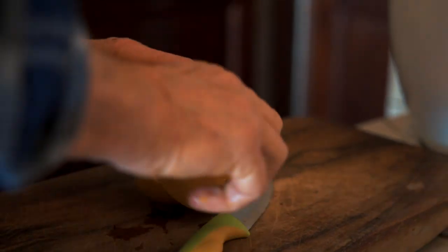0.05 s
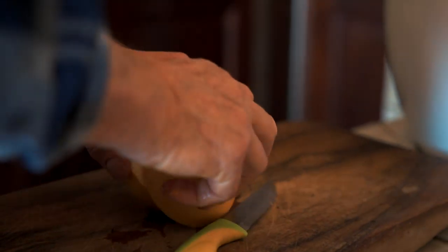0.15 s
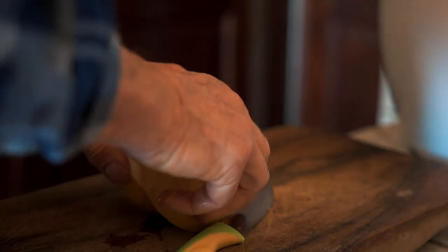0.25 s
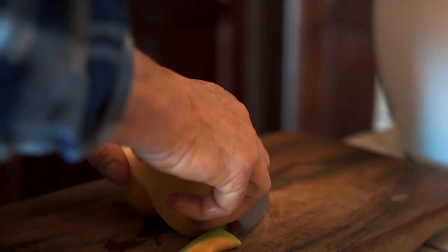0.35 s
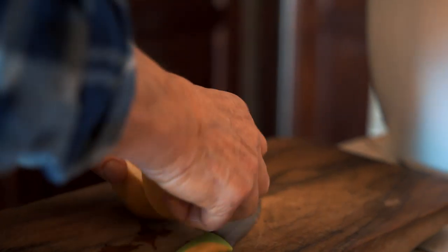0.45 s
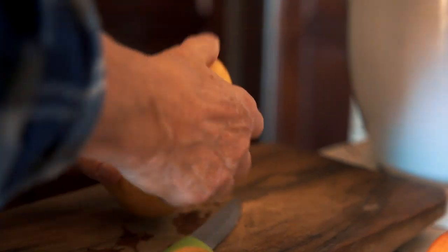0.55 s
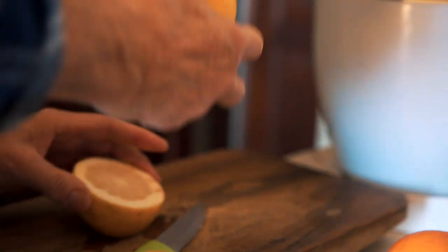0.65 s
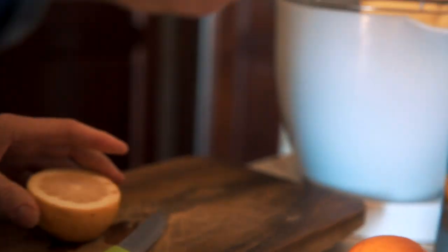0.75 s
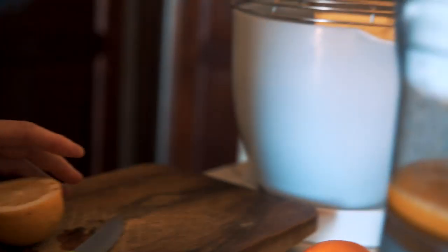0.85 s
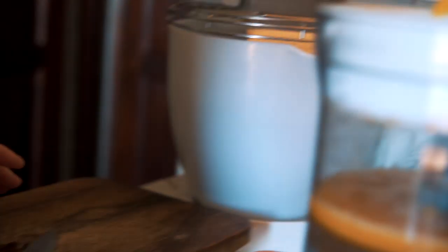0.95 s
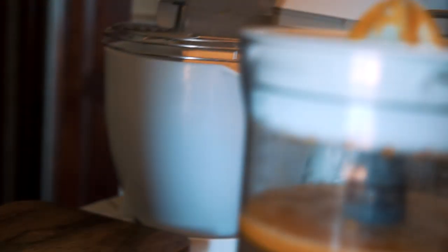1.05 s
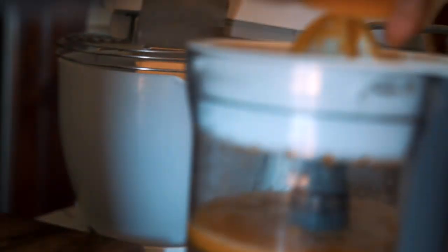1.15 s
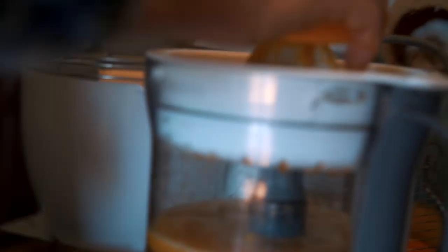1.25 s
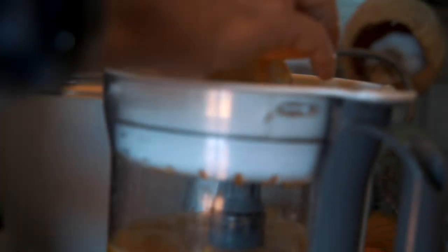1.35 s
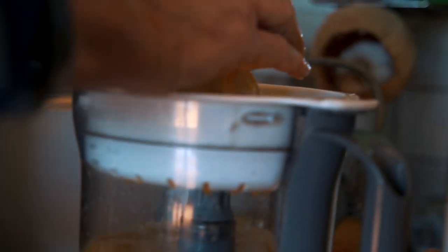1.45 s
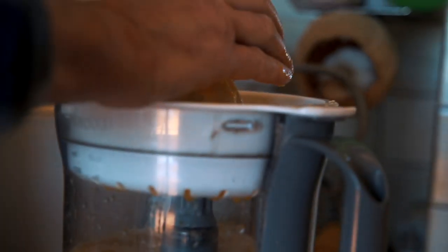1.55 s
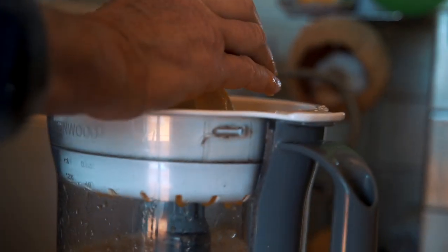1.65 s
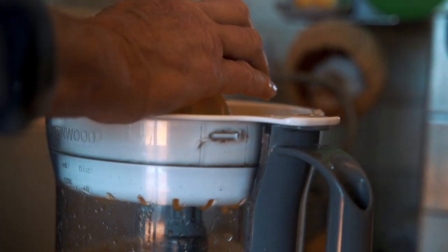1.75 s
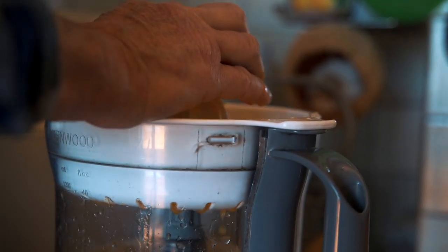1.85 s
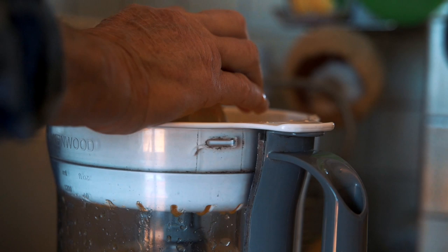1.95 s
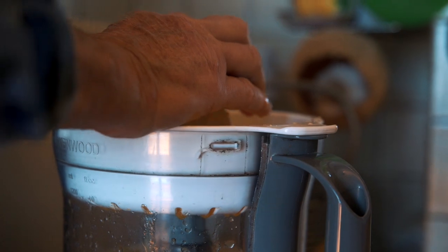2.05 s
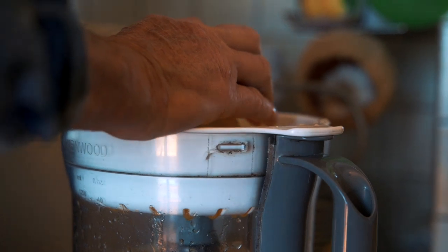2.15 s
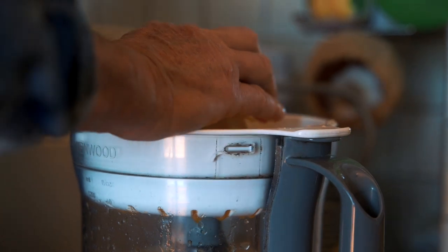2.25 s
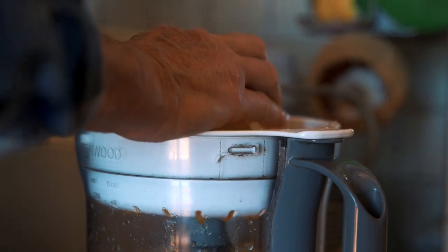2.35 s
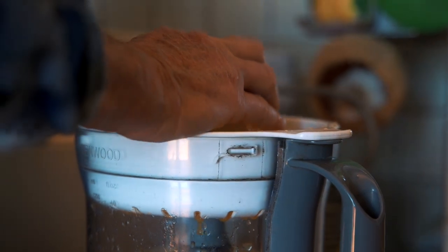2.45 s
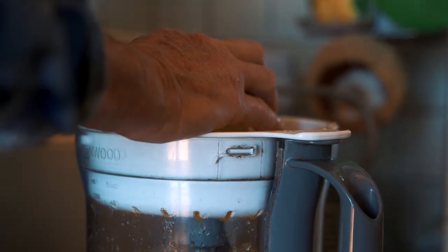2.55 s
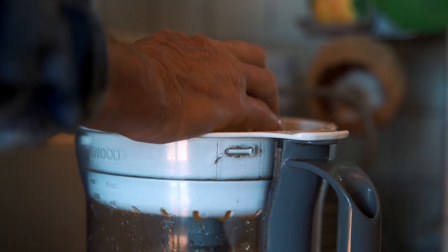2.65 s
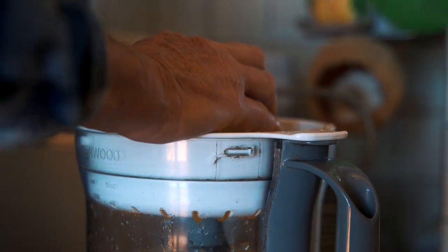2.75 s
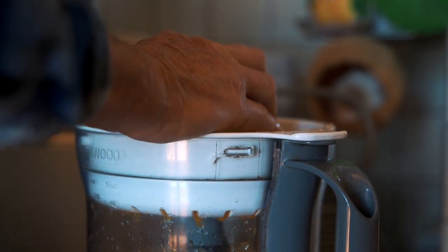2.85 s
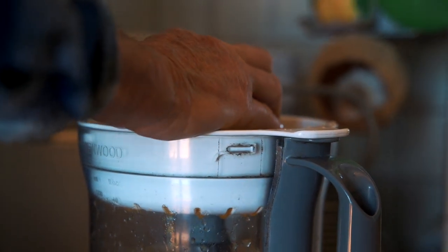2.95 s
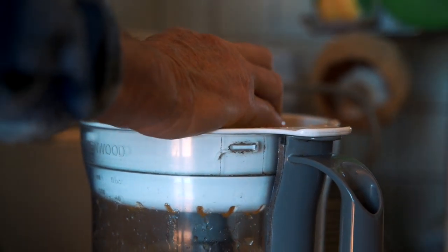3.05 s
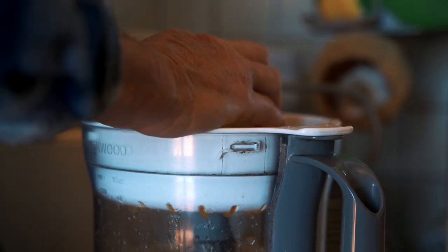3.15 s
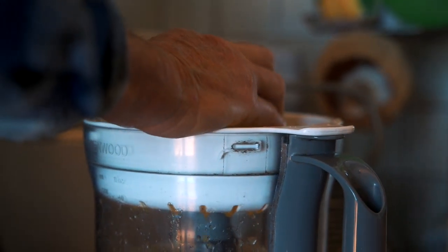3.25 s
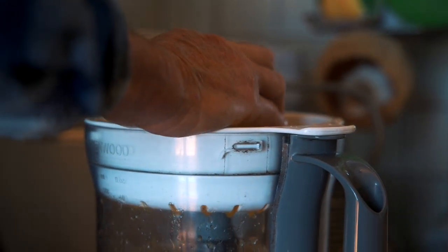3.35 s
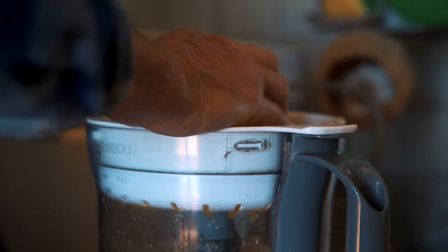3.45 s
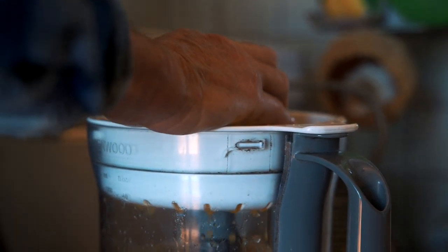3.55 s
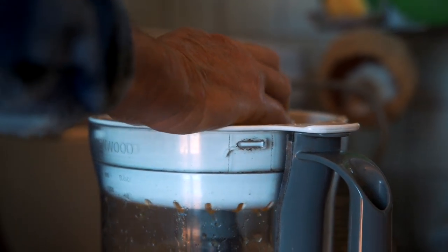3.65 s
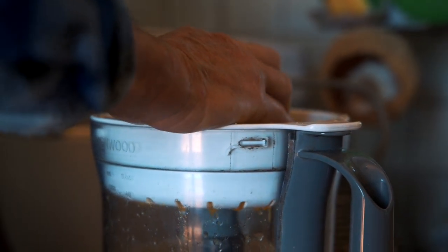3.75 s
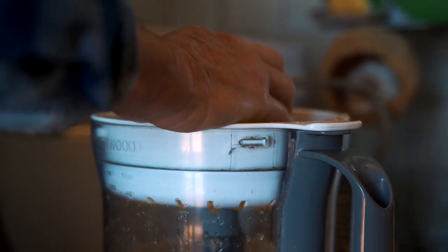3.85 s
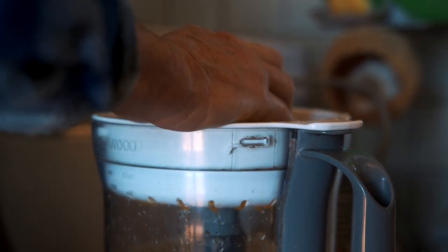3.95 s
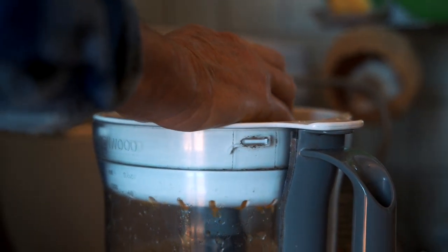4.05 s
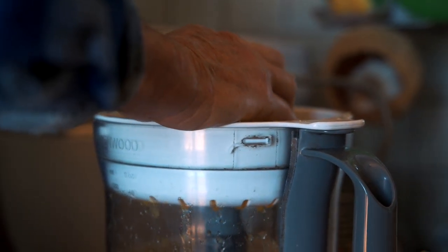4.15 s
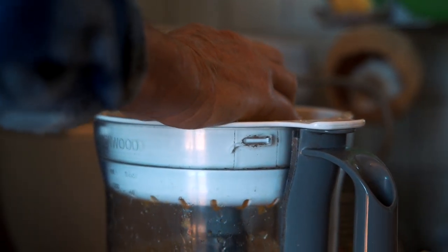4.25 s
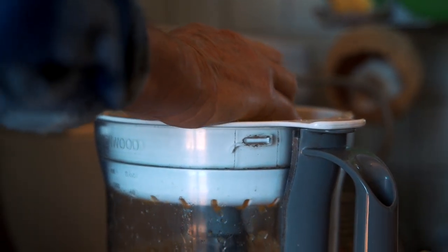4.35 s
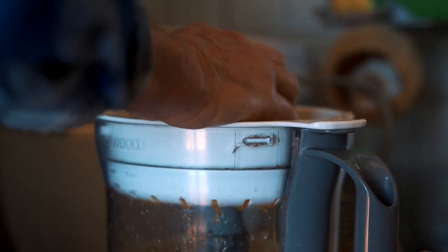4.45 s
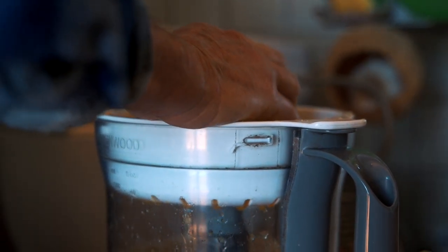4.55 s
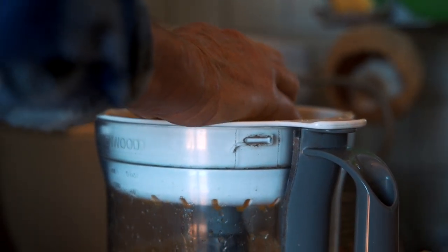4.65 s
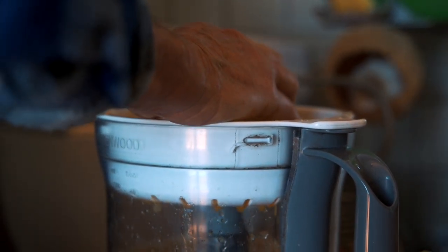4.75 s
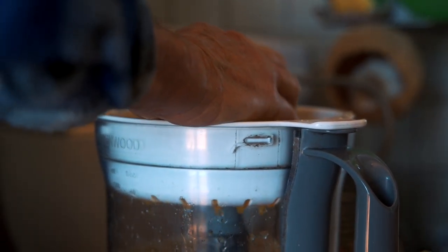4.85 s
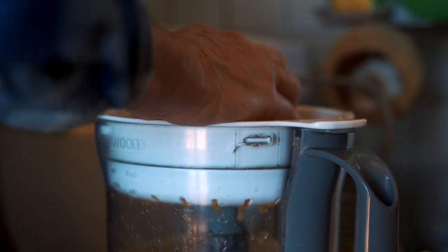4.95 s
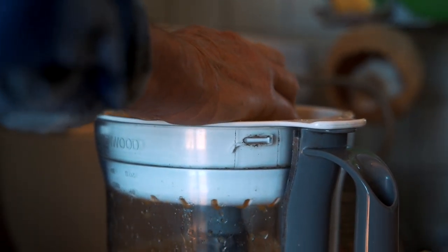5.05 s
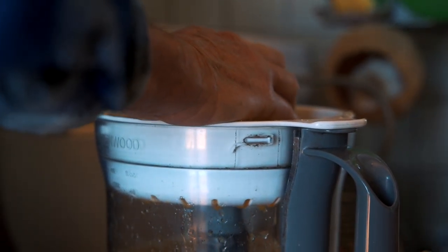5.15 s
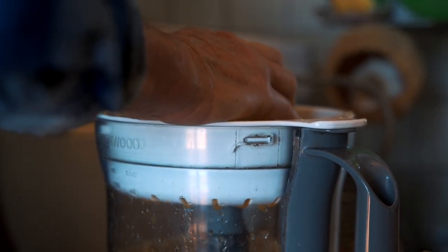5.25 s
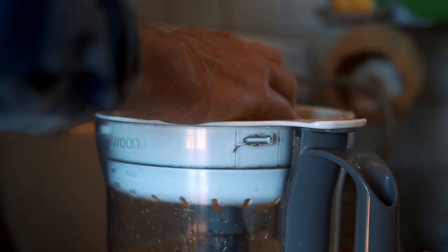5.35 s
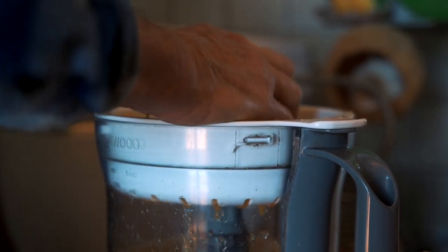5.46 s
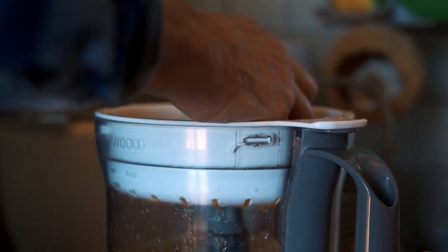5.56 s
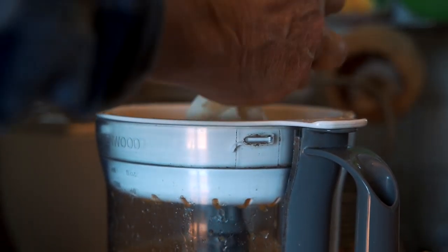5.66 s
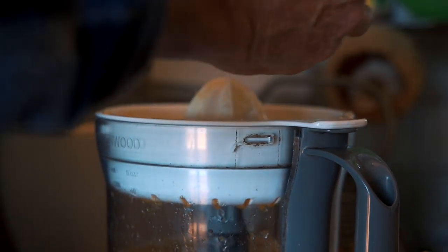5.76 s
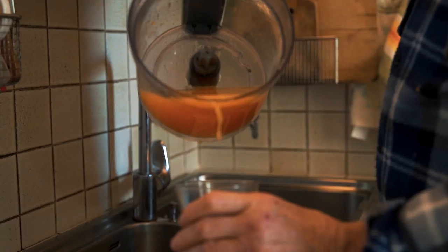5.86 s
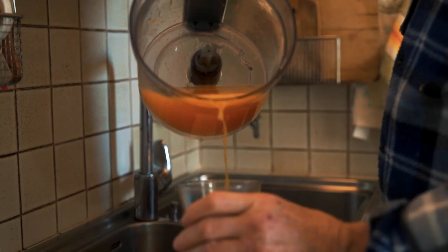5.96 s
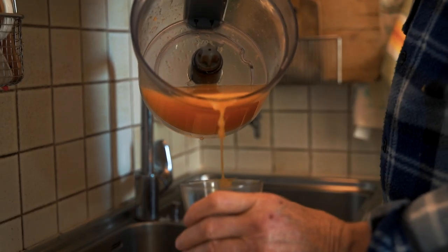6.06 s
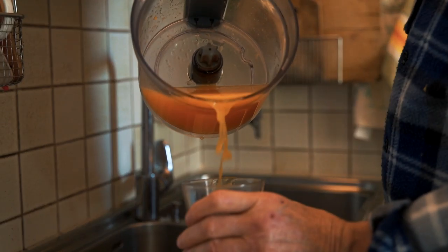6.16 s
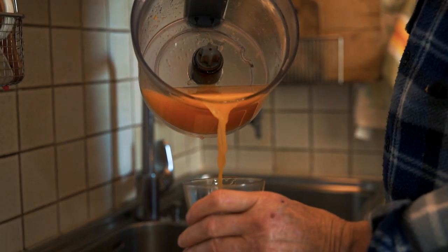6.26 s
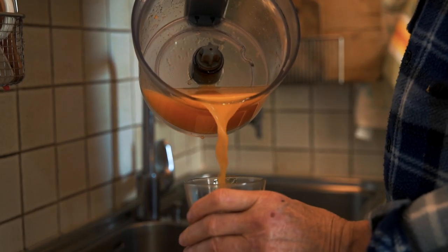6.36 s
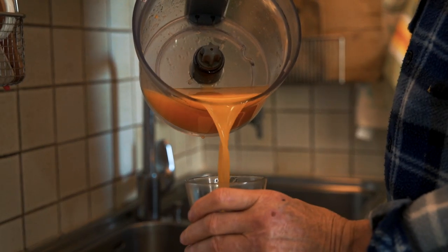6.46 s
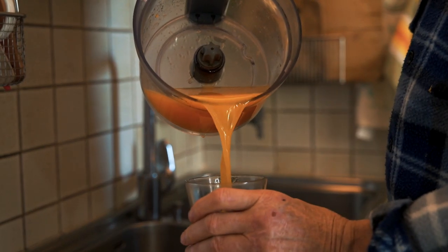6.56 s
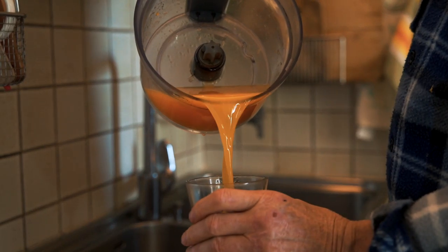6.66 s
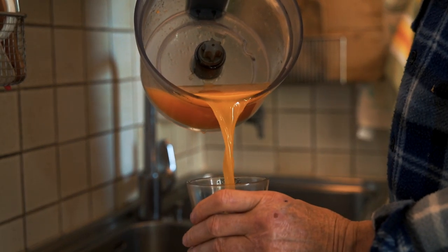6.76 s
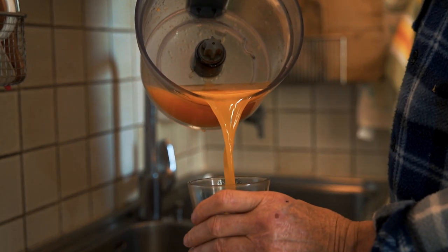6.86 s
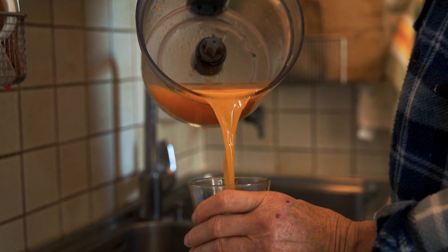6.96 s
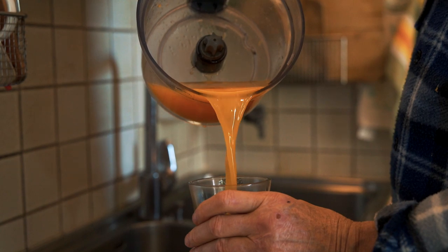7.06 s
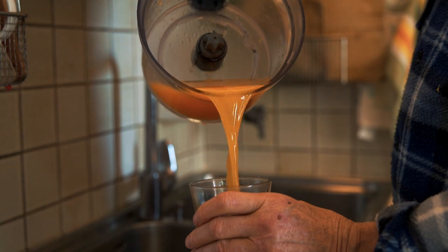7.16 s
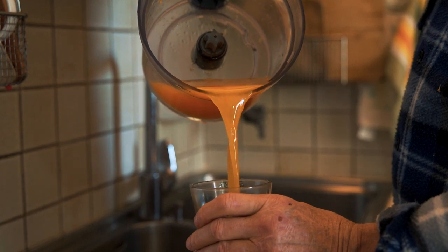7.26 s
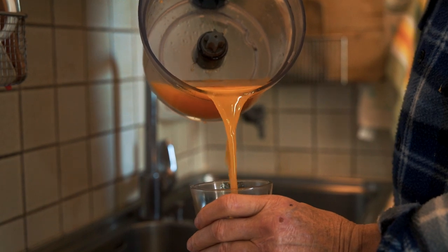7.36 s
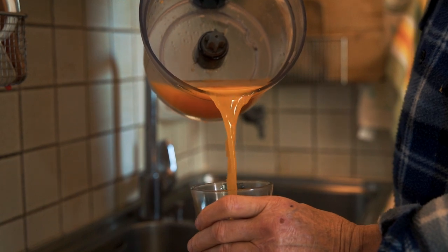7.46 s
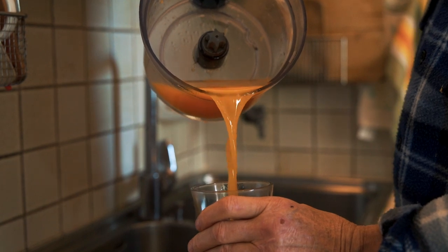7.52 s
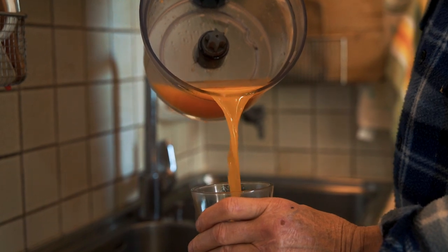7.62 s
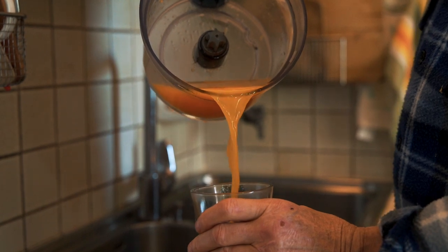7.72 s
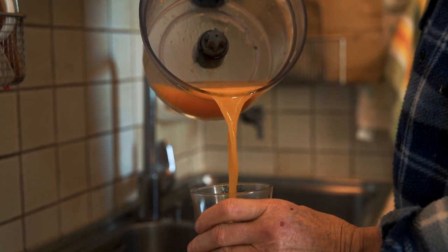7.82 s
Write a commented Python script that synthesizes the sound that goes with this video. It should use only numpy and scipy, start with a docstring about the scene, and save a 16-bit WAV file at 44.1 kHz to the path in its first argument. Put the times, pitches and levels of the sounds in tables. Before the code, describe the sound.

A knife drops on a wooden board with a sharp, ringing clatter. Soft thuds and brushing follow, then hollow plastic knocks as a lemon half is seated on an electric juicer. The motor runs up, whines and rattles steadily for about three seconds, then winds down and stops. Juice trickles quietly into a glass with small plinks and glugs. The microphone is close, in a small, slightly reverberant kitchen.

```python
"""Juicing a lemon

A knife drops on a wooden board and rings in its bending modes. Half a lemon is seated on an electric
juicer, whose belt-driven motor shakes the housing: it runs up, whines and rattles under the hand, and
coasts down. The juice is poured into a glass, where trapped air resonates in plinks and glugs.
A small tiled kitchen reverberates around one close microphone."""
import sys
import numpy as np
from scipy import signal
from scipy.fft import rfft, irfft
from scipy.io import wavfile

SR = 44100
rng = np.random.default_rng(int(sys.argv[2]) if len(sys.argv) > 2 else 0)


def int16_out(signal):
    """Quantize to a 16-bit WAV file."""
    q = np.round(np.clip(np.atleast_2d(signal).T, -1, 1) * 32767)
    wavfile.write(sys.argv[1], SR, q.astype(np.int16))


N = 347949
TIME = np.arange(N) / SR


def amp(db):
    """Decibels to amplitude ratio."""
    return 10 ** (np.asarray(db) / 20)


def unit(x):
    """Normalisation to rms 1."""
    return x / np.sqrt(np.mean(x ** 2) + 1e-20)


def read(points, hz):
    """Interpolation on a log-frequency axis."""
    f, value = np.transpose(points)
    return np.interp(np.log(hz + 1), np.log(f + 1), value)


def between(start, end, fade=0.0091):
    """A gate with linear ramps."""
    return np.clip((TIME - start) / fade + .5, 0, 1) * np.clip((end - TIME) / fade + .5, 0, 1)


def swells(rows):
    """Asymmetric Gaussian envelopes, adding in power as incoherent sounds do."""
    return np.sqrt(sum(amp(db) ** 2 * np.exp(-2 * ((TIME - s) / np.where(TIME < s, rise, fall)) ** 2)
                       for s, db, rise, fall in rows))


def bumps(rows, width):
    """Gaussian pulses from rows of (time, height)."""
    return sum(height * np.exp(-((TIME - s) / width) ** 2) for s, height in rows)


def add(mix, start_s, sound):
    """Superposition of a sound on the mix."""
    part = mix[max(round(start_s * SR), 0):][:len(sound)]
    part += sound[:len(part)]


def colour(x, tone, peaks=()):
    """Minimum-phase filtering by a spectrum and its resonances; rms 1."""
    hz = np.fft.rfftfreq(4096, 1 / SR)
    db = read(tone, hz) + sum(gain * np.exp(-((hz - f) / width) ** 2) for f, width, gain in peaks)
    log_gain = np.log(amp(np.r_[db, db[-2:0:-1]]))
    taps = np.fft.ifft(np.exp(np.conj(signal.hilbert(log_gain)))).real
    return unit(signal.oaconvolve(x, taps)[:len(x)])


def noise():
    """White noise."""
    return rng.standard_normal(N)


def wander(hz):
    """Low-pass random fluctuation; rms 1."""
    return unit(irfft(rfft(noise()) / (1 + (np.fft.rfftfreq(N, 1 / SR) / hz) ** 4), N))


def clicks(per_s, spread_db):
    """Poisson impulses, mostly small, a few large."""
    impulses = (rng.random(N) < per_s / SR) * rng.choice([-1, 1], N)
    return impulses * amp(spread_db * np.minimum(rng.exponential(1, N), 4))


def ring(modes, detune=0.):
    """Free decay of struck modes, neighbours in antiphase; peak 1."""
    t = np.arange(SR) / SR
    sound = np.zeros(SR)
    for k, (hz, db, t60) in enumerate(modes):
        hz *= 1 + detune * rng.uniform(-0.8, 1)
        sound += (-1) ** k * amp(db - 60 * t / t60) * np.sin(2 * np.pi * hz * t)
    return sound / abs(sound).max()


def crack(tone, t60):
    """A brief contact radiates a broadband burst; peak 1."""
    t = np.arange(4096) / SR
    sound = colour(rng.standard_normal(len(t)) * amp(-60 * t / t60), tone)
    return sound / abs(sound).max()


# blade modes, grazing and struck: pitch_hz, level_db, t60_s
GRAZE_MODES = [(735, 2.5, 0.19), (1084, -10.5, 0.15), (1779, 4.5, 0.06), (1940, -16, 0.073)]
BLADE_MODES = [(424, -16, .55), (705, -12, 1), (1030, -25.5, .25), (1115, -14.5, 0.22), (1628, -6, 0.61),
               (1660, -5.5, 0.53), (1735, -7.5, .17), (2030, -15.5, 0.21), (2018, 0, 0.23),
               (2070, -4.5, 0.37), (2706, -22.5, .3)]
# bounces: start_s, ring_db, crack_db, tip_db
KNIFE_BLOWS = [(0.022, -46, -29, -29), (0.056, -8, 9, -6), (0.086, -24, -32, -45), (0.108, -19, -25, -40),
               (0.128, -17, -20, -11), (0.152, -18, -32, -48), (0.219, -24, -45, -36)]
# the handle slaps, then settles: peak_s, level_db, rise_s, fall_s
CHATTERS = [(.118, -11, 0.033, 0.016), (.15, -25.5, .05, 0.13)]
# spectra of handle, blade and tip on wood: frequency_hz, level_db
CHATTER_TONE = [(60, -14), (120, 12.5), (200, -9.5), (330, -7.5), (520, -8.5), (1100, -4.5), (1900, 5.5),
                (2600, -12.5), (4200, -20.5), (7000, -40), (15000, -50.5)]
SNAP_TONE = [(400, -18.5), (1200, -6), (2000, 6), (2900, -2), (3900, 6.5), (5000, -2), (6000, -7.5),
             (8000, -13), (11000, -20), (15500, -28.5)]
TIP_TONE = [(2000, -31.5), (5000, -10), (9500, -1), (15500, -14)]

def knife():
    """Impact excitation: each bounce rings the blade, and the chattering handle keeps it buzzing."""
    chatter = swells(CHATTERS) * colour(clicks(2700, 1.7), CHATTER_TONE)
    buzz = unit(signal.oaconvolve(chatter, ring(BLADE_MODES))[:N])
    out = chatter + amp(-8) * chatter.std() * buzz
    add(out, 0, amp(-15) * ring(GRAZE_MODES))
    for s, ring_db, crack_db, tip_db in KNIFE_BLOWS:
        add(out, s, amp(ring_db) * ring(BLADE_MODES, detune=.003))
        add(out, s, amp(crack_db) * crack(SNAP_TONE, t60=.016))
        add(out, s, amp(tip_db) * crack(TIP_TONE, t60=.012))
    return out


# blows on the worktop: start_s, level_db
THUDS = [(0.058, -23), (0.115, -12.5), (0.706, -16), (0.737, -23), (0.783, -28), (0.821, -26),
         (1.025, -23.5), (1.06, -30), (1.274, -35)]
# board modes: pitch_hz, level_db, t60_s
BOARD_MODES = [(83.6, -0.5, 0.28), (121, 4, 0.15), (151.9, 0.5, .18), (185, -6, 0.089), (238.8, -7.5, 0.23)]

def thuds():
    """Soft impacts excite only the low modes of the board."""
    out = np.zeros(N)
    for s, db in THUDS:
        add(out, s, amp(db) * ring(BOARD_MODES, detune=0.07))
    return out


# the microphone swings to the juicer: peak_s, level_db, rise_s, fall_s
SWING = [(1.03, -25.5, 0.34, 0.58)]
# rumble spectrum: frequency_hz, level_db
RUMBLE_TONE = [(12, 0.5), (22, 2.5), (35, -2), (60, -18), (110, -18.5), (180, -25.5), (300, -43),
               (600, -77)]

def handling_rumble():
    """Structure-borne noise reaches the microphone, chiefly while it is carried."""
    carried = amp(-48) + amp(-30.5) * between(0.21, 2.07, fade=0.15)
    return np.hypot(carried, swells(SWING)) * colour(noise(), RUMBLE_TONE)


# strokes of sleeve and fruit: peak_s, level_db, rise_s, fall_s
STROKES = [(.6, -42.5, .19, 0.13), (.86, -52, 0.022, 0.1), (1.03, -51.5, 0.077, 0.052),
           (1.2, -44, 0.067, 0.19), (1.5, -53.5, 0.12, 0.53), (1.73, -50, 0.027, 0.12),
           (1.97, -46, 0.053, 0.035)]
# brushing spectrum: frequency_hz, level_db
BRUSH_TONE = [(300, 0), (700, 0), (1500, 0.5), (4500, -4), (7000, -13.5), (11000, -21), (15500, -24.5)]

def brushing():
    """Sliding friction makes broadband noise with a fine grain."""
    return swells(STROKES) * colour(noise() + 3 * clicks(280, 1.5), BRUSH_TONE)


# fruit and hand hit the bowl, and a last tick sounds as the jug is moved: start_s, level_db, body_relative_db,
# tick_relative_db, pitch_hz
KNOCKS = [(0.703, -29, -2, -27, 710), (0.85, -27, -21, -10.5, 1065), (1.027, -25.5, -9.5, -19, 920),
          (1.271, -25, 2, -5, 960), (1.378, -32.5, 11.5, -10, 1000), (1.711, -39.5, 9, 12, 2060),
          (1.747, -44.5, -23, 15.5, 2300), (1.811, -23, -6, -9, 1020), (1.91, -13.5, -11, -1, 1580),
          (1.917, -18.5, -21, -10, 1900), (1.982, -36, -13.5, 6, 820), (2.031, -29.5, -14, -4.5, 1010),
          (2.076, -14.5, -7, -22, 1250), (6.271, -47, 8, -4, 732)]
# bowl modes: pitch_hz, level_db, t60_s
BODY_MODES = [(291, -1.5, 0.067), (351, -7, 0.062), (464, -8, 0.12), (600, -7, 0.05)]
WALL_MODES = [(888, -0.5, 0.038), (1107, -2.5, 0.039), (1350, 5, 0.023), (1594, 3, 0.03),
              (1916, 2.5, 0.031), (2210, -6.5, 0.036), (2700, -11, 0.032)]
# contact spectrum, also of falling drops: frequency_hz, level_db
TICK_TONE = [(500, -21), (2000, 3), (3900, -2), (6000, -10), (9000, -15.5), (15000, -31)]

def bowl_knocks():
    """Damped modes of a plastic shell; each striking point favours one of them."""
    out = np.zeros(N)
    for s, db, body_db, tick_db, hz in KNOCKS:
        add(out, s, amp(db) * ring(WALL_MODES, detune=0.123))
        add(out, s, amp(db - 5) * ring([(hz, 0, .04)]))
        add(out, s + 0.0021, amp(db + body_db) * ring(BODY_MODES, detune=0.13))
        add(out, s, amp(db + tick_db) * crack(TICK_TONE, t60=0.032))
    return out


# the lemon is seated: peak_s, level_db, rise_s, fall_s
RUBS = [(1.27, -34.5, 0.0095, 0.045), (1.39, -44.5, 0.013, 0.12), (1.8, -42.5, 0.23, 0.12),
        (1.92, -26, 0.0059, .014), (1.94, -38, .01, 0.052)]
# rubbing spectrum: frequency_hz, level_db
RUB_TONE = [(110, -52.5), (180, -44), (280, -9), (703, -29.5), (972, -31), (1010, -29), (1530, -26.5),
            (4000, -49), (5200, -66), (8800, -120)]

def peel_rub():
    """Stick-slip friction of peel on the cone gives a dense train of impulses."""
    return swells(RUBS) * colour(clicks(900, 1.6), RUB_TONE)


MOTOR_ON_S, POWER_CUT_S, MOTOR_OFF_S = 2.07, 5.32, 5.905
SLOTS, FREE_WHINE_HZ, STALL_HZ = 16, 2495, 650
# the hand bears down: peak_s, half_width_s, sag_hz
PRESSES = [(3.5, .33, 80), (4.42, .25, 58), (4.9, .24, 76)]

def motor_speed(kick_share=.44, spin_up_s=.145, coast_s=.32):
    """Inertia smooths run-up and coast, and load slows the shaft; gives whine pitch and load (0 to 1)."""
    sag_hz = sum(bumps([(s, hz)], width) for s, width, hz in PRESSES)
    run_up = 1 - (1 - kick_share) * np.exp(-np.maximum(TIME - MOTOR_ON_S, 0) / spin_up_s)
    coast = np.exp(-np.maximum(TIME - POWER_CUT_S, 0) / coast_s)
    return (FREE_WHINE_HZ - sag_hz) * run_up * coast, sag_hz / sag_hz.max()


# whine partials: harmonic, full_speed_db, slack_belt_db, load_gain_db, wander_rad
SLOT_PARTIALS = [(1, -17.5, -13.5, 3.5, .42), (2, -8.2, -25, 0, .6), (3, -15.5, -8, 0, 1.3)]

def slot_whine(turns, whine_hz, slack, load, pulley_ratio=5.1, flutter_hz=70):
    """Harmonics of the slot-passing rate, phase-modulated by the pulley; overtones fade first."""
    phase = 2 * np.pi * SLOTS * turns + .7 * np.sin(2 * np.pi * turns / pulley_ratio)
    out = np.zeros(N)
    for k, full_db, slack_db, load_db, blur in SLOT_PARTIALS:
        db = full_db + (slack_db - full_db) * slack + load_db * load + 2.4 * wander(flutter_hz)
        rolloff = (whine_hz / FREE_WHINE_HZ) ** (k - 1)
        out += amp(db) * rolloff * np.cos(k * phase + blur * wander(flutter_hz))
    return np.clip((whine_hz - STALL_HZ) / STALL_HZ, 0, 1) * out


def rattle(turns, turns_per_lap=8.88, beat_order=0.76):
    """Periodic and random excitation: belt flaws recur every lap, gear teeth strike by chance; rms 1."""
    flaws = rng.standard_normal(2560)
    belt = unit(np.interp(turns / turns_per_lap % 1 * len(flaws), np.arange(len(flaws)), flaws))
    teeth = .6 * unit(clicks(5000, 3.06)) + .5 * noise()
    beat = 1 + .1 * np.cos(2 * np.pi * beat_order * turns)
    return unit((.46 * belt + teeth) * amp(wander(96)) * beat)


# drive tones: shaft_multiple, level_re_rattle_db, wander_rad
SHAFT_ORDERS = [(1.003, -22.5, 0.65), (1.292, -29.5, 0.16), (1.972, -31.5, 1.6), (2.89, -28.5, 0.57),
                (3.9, -33, 0.98), (6.142, -18.5, 0.14), (9.085, -21.5, 0.13), (10.07, -28.5, 0.11),
                (12.16, -22.5, 0.56), (48, -22, 1.5), (63.6, -19, 2.3), (82.5, -27, 3.8)]

def drive_tones(turns, slack):
    """Rotating parts sound at multiples of shaft speed, more weakly when the belt is slack."""
    return sum(amp(db + 2 * wander(12.5) - 6 * slack)
               * np.cos(2 * np.pi * order * turns + blur * wander(16.6))
               for order, db, blur in SHAFT_ORDERS)


# housing response: frequency_hz, level_db
HOUSING_TONE = [(30, -45.5), (80, -7), (150, -9), (290, -0.5), (460, -4), (720, -8), (900, 1), (1500, 0.5),
                (2100, -8), (3100, -18.5), (4400, -32), (6500, -35.5), (9700, -38), (15500, -51)]
# its peaks and one notch: frequency_hz, width_hz, gain_db
HOUSING_PEAKS = [(464, 22.5, 7), (1020, 33, 4), (1250, 36, 3.5), (1517, 61, 7), (1840, 33, 2),
                 (2399, 73, 5.5), (4040, 430, 4.5), (5140, 430, 5), (7900, 270, 5.5), (8590, 300, 9),
                 (11130, 1080, -7), (12300, 400, 3)]
# the drive takes up or loses its load: peak_s, gain_db
JOLTS = [(2.115, 8), (2.14, -2), (5.47, -6), (5.53, 1.5), (5.895, 10.5)]

def juicer(quiet_below_hz=1610, fade_db_per_octave=11):
    """Forced vibration: belt, gears and slots shake one housing; level and brightness follow speed."""
    whine_hz, load = motor_speed()
    turns = np.cumsum(whine_hz / SLOTS) / SR
    slowness = 1 - whine_hz / FREE_WHINE_HZ
    slack = np.clip(4 * slowness, 0, 1)  # 0 at full speed, 1 when running up or down
    running = between(MOTOR_ON_S, MOTOR_OFF_S, fade=0.0025)
    force = rattle(turns)
    force += np.sqrt(2) * (drive_tones(turns, slack) + slot_whine(turns, whine_hz, slack, load))
    body = colour(running * force, HOUSING_TONE, HOUSING_PEAKS) * np.sqrt(running.mean())
    # slower teeth strike more softly and lose their treble first
    bass = signal.sosfiltfilt(signal.butter(2, 3000, fs=SR, output="sos"), body)
    treble = (body - bass) * amp(6.5 - 8.5 * np.minimum(2 * slowness, 1))
    octaves_down = np.maximum(np.log2(quiet_below_hz / whine_hz), 0)
    return amp(-24.5 - fade_db_per_octave * octaves_down + bumps(JOLTS, 0.0053)) * (bass + treble)


# jug and glass are moved into place: peak_s, level_db, rise_s, fall_s
JUG_SHIFTS = [(5.98, -50.5, 0.095, 0.12), (6.33, -47, 0.016, 0.084)]
# sliding spectrum: frequency_hz, level_db
JUG_TONE = [(100, -22), (300, 0.5), (700, -2.5), (1400, -3), (2500, -14), (5000, -24), (10000, -39),
            (15500, -43.5)]

def jug():
    """Friction noise swells as jug and glass shift."""
    return swells(JUG_SHIFTS) * colour(noise(), JUG_TONE)


def bubble(hz, cycles, rise):
    """A bubble is a damped oscillator whose pitch climbs as it nears the surface."""
    age = np.arange(int(SR * cycles / hz) + 2) * hz / cycles / SR  # 0 to 1 over its life
    envelope = amp(-50 * age) * (1 - np.exp(-age * cycles * 2))
    return envelope * np.sin(2 * np.pi * cycles * (age + rise * (age ** 2 / 2 - age / 8)))


# single bubbles: start_s, level_db, pitch_hz
PLINKS = [(6.245, -56, 3100), (6.409, -41, 3900), (6.477, -43.5, 3150), (6.569, -39, 1430),
          (6.653, -36, 1217), (6.682, -36, 1000), (6.814, -29.5, 3150), (6.814, -31.5, 1130),
          (6.892, -35, 4470), (6.952, -28, 1097), (6.985, -37.5, 716), (6.995, -32.5, 1380),
          (7.041, -37, 1080), (7.172, -35.5, 3500), (7.17, -39, 1750), (7.283, -45, 2800),
          (7.416, -37, 3080), (7.517, -39, 2570), (7.596, -36.5, 1800), (7.643, -37, 1400),
          (7.868, -31, 3500)]

def plinks():
    """Air entrainment: a drop ticks on impact and traps a ringing bubble."""
    out = np.zeros(N)
    for s, db, hz in PLINKS:
        add(out, s, amp(db) * bubble(hz, cycles=55.6, rise=0.42))
        add(out, s, amp(db - 10.5) * crack(TICK_TONE, t60=0.033))
    return out


POUR_FROM_S, POOL_S, FULL_FLOW_S = 6.42, 7.09, 7.23
# gushes: peak_s, fizz_gain_db
GUSHES = [(6.81, 10), (7.047, 5), (7.115, 8), (7.39, 6), (7.42, 7.5), (7.62, 5.5), (7.78, 13), (7.875, 7.5)]
# spectra of splash, small bubbles, spatter, froth and churning pool: frequency_hz, level_db
SPLASH_TONE = [(300, -30), (700, -2), (1200, 10.5), (2000, 7.5), (3200, 1.5), (6000, -23)]
FIZZ_TONE = [(1470, -29), (2500, 2.5), (3030, 5), (4010, 2), (6300, 3.5), (12500, -8), (13600, -3.5),
             (15500, -20)]
SPRAY_TONE = [(1500, -18), (3500, -2), (7000, -1), (11000, -3), (15500, -12)]
FROTH_TONE = [(1500, -14), (4000, 2), (7000, 0), (11000, -10.5), (13500, -9), (15500, -15)]
CHURN_TONE = [(53, -98), (90, 1), (124, -12), (167, 3), (350, 1), (655, -3.5), (900, -24), (1170, -24),
              (1980, -120)]

def stream(drop_decay_s=0.0024):
    """A plunging jet traps bubbles; it splashes more on bare glass, froths and churns more in a pool."""
    trickle = np.clip((FULL_FLOW_S - TIME) / (FULL_FLOW_S - POUR_FROM_S), 0, 1)
    shallow = between(0, POOL_S, fade=0.044)
    gush_db = bumps(GUSHES, 0.0093)
    swarm = unit(sum(signal.oaconvolve(clicks(10, 3.4), bubble(hz, cycles=32, rise=.2))[:N]
                     for hz in np.geomspace(750, 15000, 30)))
    drops = signal.lfilter([1], [1, -np.exp(-1 / (drop_decay_s * SR))], abs(clicks(80, 4.5)))
    spray = amp(-61.5 + 1.5 * shallow) * colour(drops * noise(), SPRAY_TONE)
    splash_db = -52.5 - 20 * trickle + 9.5 * shallow + .6 * gush_db
    splash = amp(splash_db) * colour(swarm + .93 * noise(), SPLASH_TONE)
    froth = amp(-58.5 - 6 * shallow) * colour(noise(), FROTH_TONE)
    fizz = amp(gush_db - 9 * trickle) * (amp(-54.5) * colour(swarm, FIZZ_TONE) + spray + froth)
    churn = amp(-52.5 - 11.5 * shallow) * colour(noise(), CHURN_TONE)
    return (splash + fizz + churn) * between(POUR_FROM_S, np.inf)


# air pockets: start_s, length_s, start_hz, end_hz, level_db
GLUGS = [(6.5, .15, 175, 520, -54), (6.645, .16, 175, 540, -50), (7.09, .13, 155, 480, -46),
         (7.345, .145, 165, 540, -46), (7.655, .13, 180, 420, -45), (7.72, .1, 330, 390, -40)]

def glugs():
    """Large air pockets resonate low and glide upward as they surface."""
    out = np.zeros(N)
    for s, length_s, start_hz, end_hz, db in GLUGS:
        n = int(length_s * SR)
        envelope = amp(db + 2 * wander(55)[:n]) * signal.windows.tukey(n, .5)
        phase = 2 * np.pi * np.cumsum(np.geomspace(start_hz, end_hz, n)) / SR
        add(out, s, envelope * np.sin(phase + .5 * wander(49)[:n]))
    return out


# reverberation times: frequency_hz, t60_s
KITCHEN_DECAY = [(100, 0.95), (500, 0.99), (2000, 0.67), (6000, 0.34), (15000, 0.18)]

def kitchen(x):
    """Reverberation: dense reflections off the tiles decay at a different rate in each band."""
    n = SR // 2
    reflections = rng.standard_normal(n) * (rng.random(n) < .1) * (TIME[:n] > .004)
    hz, t, bands = signal.stft(reflections, SR, nperseg=256)
    tail = signal.istft(bands * amp(-60 * t / read(KITCHEN_DECAY, hz)[:, None]), SR, nperseg=256)[1]
    return signal.oaconvolve(x, tail / np.linalg.norm(tail))[:N]


# background noise of the room: frequency_hz, level_db
AIR_TONE = [(30, -5.5), (100, -11), (200, -12), (600, -23.5), (1200, -24), (3000, -36.5), (8000, -50),
            (15000, -45)]

def scene():
    """Superposition: direct and reverberant sound add in the centre, practically mono."""
    blade, blows, motor = knife(), thuds() + bowl_knocks(), juicer()
    juice = stream() + jug() + plinks() + glugs()
    room = kitchen(amp(-15) * blade + amp(-11.5) * blows + amp(-17) * motor + amp(-11) * juice)
    hands = brushing() + peel_rub() + handling_rumble()
    air = amp(-57) * colour(noise(), AIR_TONE)
    mid = blade + blows + hands + motor + juice + room + air
    side = amp(-71) * kitchen(blade) + amp(-61.5) * kitchen(np.diff(mid, prepend=0))
    return np.array([mid + side, mid - side])


def record(dry, cutoff_hz=15850):
    """Overload clips the loudest crack; a low-pass filter then limits the band."""
    lowpass = signal.firwin(511, cutoff_hz, window=("kaiser", 9), fs=SR)
    return signal.oaconvolve(np.clip(dry, -1, 1), lowpass[None], "same")


dry = scene()
out = record(dry)
int16_out(out)
```